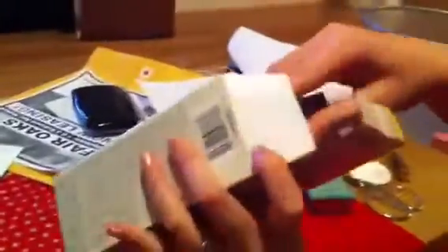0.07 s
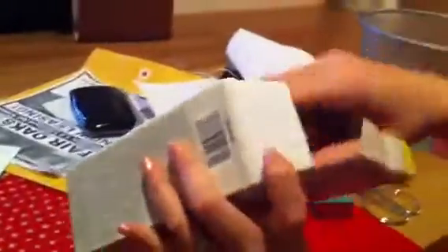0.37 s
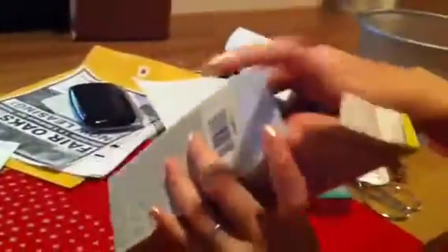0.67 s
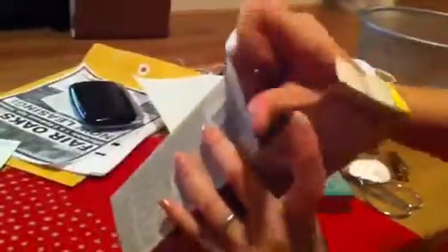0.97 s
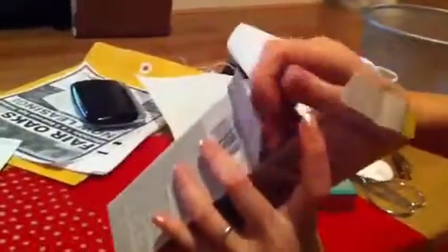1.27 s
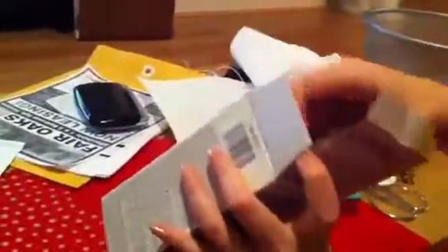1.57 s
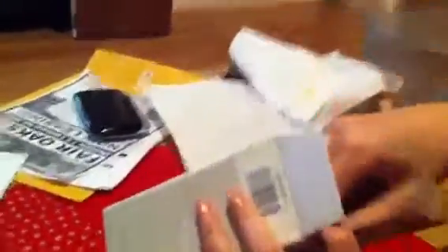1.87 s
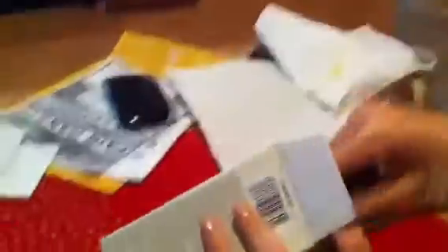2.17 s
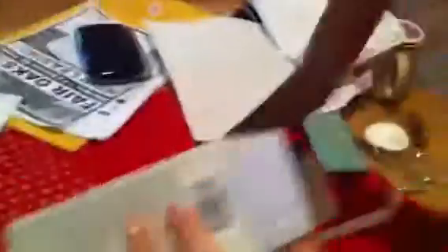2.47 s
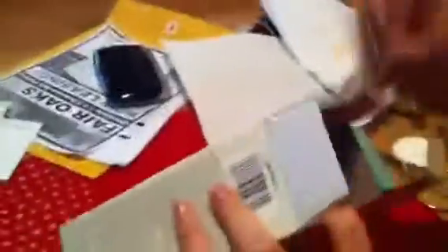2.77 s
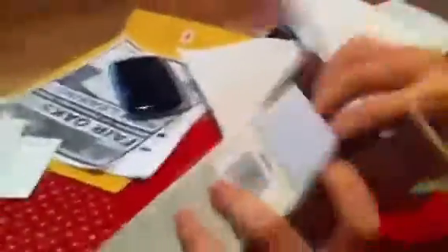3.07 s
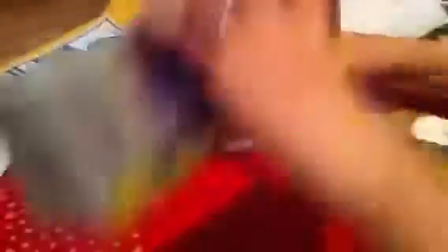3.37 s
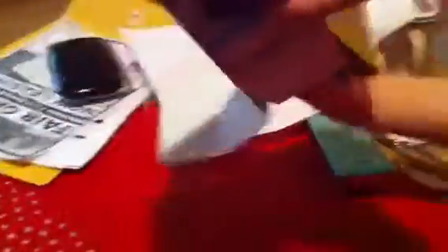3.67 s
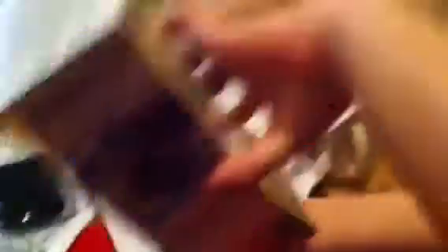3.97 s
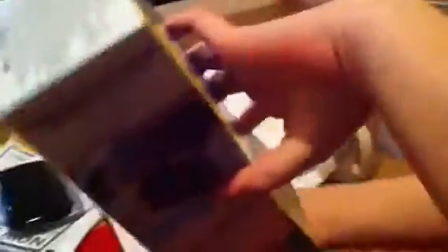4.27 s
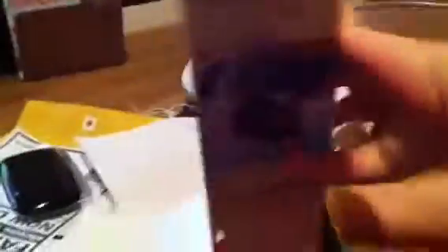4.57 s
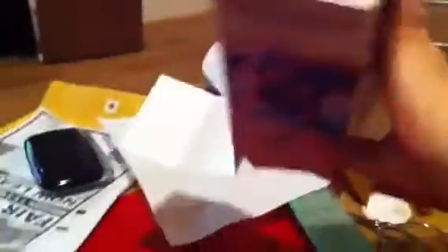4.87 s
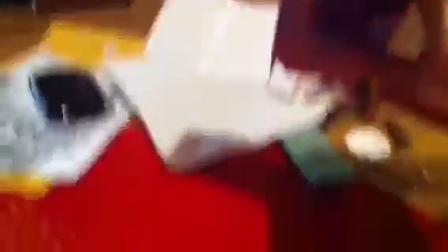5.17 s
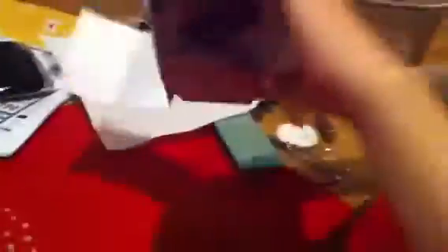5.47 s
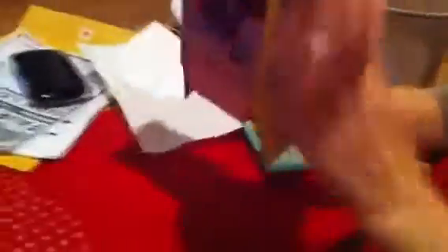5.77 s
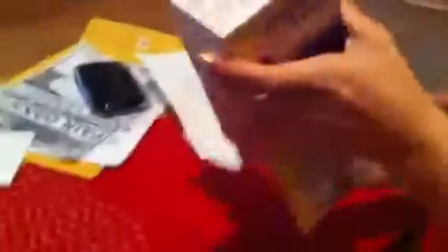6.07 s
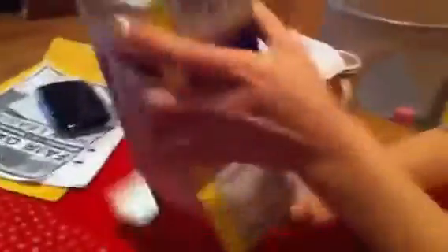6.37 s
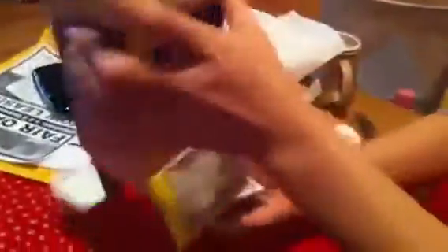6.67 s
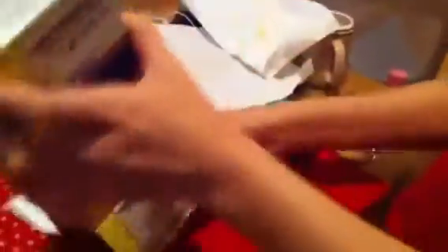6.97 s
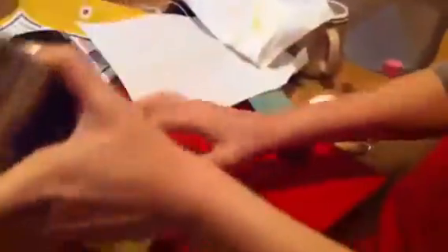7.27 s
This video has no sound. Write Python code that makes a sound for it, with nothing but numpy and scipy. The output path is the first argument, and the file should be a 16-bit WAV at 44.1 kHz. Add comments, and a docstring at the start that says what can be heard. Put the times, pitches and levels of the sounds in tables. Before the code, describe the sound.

In a small, quiet room, close to the microphone, hands work open a thin cardboard box. Scattered dull taps and brief rubs lead to a single sharp click as the tab springs out of its slot. Busier handling follows, with uneven scraping and rustling of card, light hollow knocks and ticks from bending edges, growing crisper toward the end over a faint steady room tone.

```python
"""Opening a thin cardboard box

Hands work close up, over a table in a small, quiet room. Fingers knock on the damped panels,
thump the hollow and pick at the flap until the tab snaps free. As the box is turned over, card
slides on card and on skin with a hiss and a rasp, and its edges and creases give crisp ticks."""
import sys
import numpy as np
from scipy import signal
from scipy.fft import rfft, irfft, next_fast_len
from scipy.io import wavfile
from scipy.ndimage import uniform_filter1d, map_coordinates

SR = 44100
rng = np.random.default_rng(int(sys.argv[2]) if len(sys.argv) > 2 else 0)


def master(y):
    """Save y as 16-bit WAV."""
    cut = np.clip(np.atleast_2d(y).T, -1, 1)
    pcm = np.round(cut * 32767)  # scale
    wavfile.write(sys.argv[1], SR, pcm.astype(np.int16))


N = 327633

# the murmur and hiss of the quiet room: frequency_hz, relative_db
ROOM_TONE_EQ = [(60, -49), (95, -14.5), (135, -5), (175, 7), (225, -6.5), (320, -1.5), (430, -9),
                (720, -9.5), (1300, -14), (2500, -24.5), (12000, -24.5)]
# how long the walls ring: frequency_hz, t60_s
ROOM_DECAY = [(150, 0.63), (1000, 0.67), (3000, 1), (12000, 0.16)]
# resonances of the pinched flap: start_s, end_s, pitch_hz, width_hz, gain
GRIPS = [(0, 1.428, 2280, 178, 1.07), (0.55, 1.05, 1140, 130, 0.52), (1.848, 2.75, 3460, 110, 1.3),
         (5.76, 6.05, 2490, 400, 1.5)]
# card slides on card or skin: fastest_s, length_s, level_db, hiss_offset_db
STROKES = [(.06, 0.085, -60.5, -1.5), (0.503, 0.1, -54, -4), (0.702, 0.15, -53, -3.5),
           (1.032, 0.19, -61.5, -1.5), (1.192, 0.051, -55.5, -5), (1.37, 0.12, -68.5, 6.5),
           (1.764, 0.7, -64.5, -8), (2.163, 0.49, -59.5, -1.5), (2.225, 0.043, -45, -5.5),
           (2.347, 0.15, -50.5, -3.5), (2.405, 0.12, -50, 2.5), (2.533, 0.037, -45.5, 0.5),
           (2.894, 0.08, -69.5, 10), (3.132, 0.09, -56, -2), (3.285, 0.11, -55, -2),
           (3.592, 0.063, -55.5, -4.5), (3.781, 0.28, -54.5, -2), (3.917, 0.064, -48, -4.5),
           (4.01, 0.13, -61.5, 4), (4.111, 0.075, -52.5, -2.5), (4.372, 0.17, -53.5, -11),
           (4.594, 0.11, -47, -0.5), (4.686, 0.085, -57, -2.5), (4.804, 0.073, -53, -5),
           (4.91, 0.61, -62.5, 0), (5.234, 0.14, -66, 1), (5.421, 0.066, -55, 0), (5.53, 0.073, -55.5, 3),
           (5.628, 0.32, -63, 3.5), (5.882, 0.11, -58.5, -3), (6.115, 0.083, -58.5, -1.5),
           (6.225, 0.13, -59.5, -2), (6.301, 0.068, -50, -6), (6.436, 0.093, -50, -5),
           (6.497, 0.052, -48.5, -9), (6.602, 0.14, -46, -4), (6.71, 0.035, -47.5, -8),
           (6.744, 0.082, -51.5, 3), (6.808, 0.058, -49, 3), (6.903, 0.095, -54.5, 5), (6.982, 0.1, -51, 1),
           (7.104, 0.12, -51, 4.5), (7.19, 0.036, -63, 3), (7.244, 0.14, -54, 8), (7.38, 0.04, -57.5, 5.5)]
# a palm shifts on the hollow box: strongest_s, length_s, level_db
PALM_SHOVES = [(0.07, 0.079, -56.5), (0.518, 0.16, -54.5), (0.774, 0.36, -58), (2.428, 0.14, -57.5),
               (3.122, 0.029, -47.5), (3.292, 0.047, -40.5), (3.685, 0.11, -53), (6.325, 0.037, -53),
               (6.514, 0.11, -46.5), (6.72, 0.1, -55.5), (6.877, 0.023, -54)]
# friction hissing at the surface: frequency_hz, relative_db
HISS_EQ = [(900, -15.5), (2000, 1), (3400, -4), (5500, -2.5), (8000, -7), (11500, -7), (15000, -11.5),
           (16000, -42)]
# friction rasping in the panels: frequency_hz, relative_db
RASP_EQ = [(250, -55), (450, -5.5), (750, 5), (950, -1), (1300, 0), (1900, -8), (3300, -11), (7000, -19.5)]
# friction rumbling in the hollow: frequency_hz, relative_db
RUMBLE_EQ = [(30, -36), (72, -61), (115, -5.5), (180, -4.5), (280, -1.5), (400, -7.5), (1200, -47)]
# flexing card gives way in clusters of tiny creases: middle_s, length_s, level_db, brightness_hz
CREASE_CLUSTERS = [(0.419, .006, -52, 2940), (2.399, .025, -43.5, 2000), (4.831, 0.086, -49, 4570),
                   (5.209, .15, -55, 3500), (5.426, 0.086, -48, 6000), (5.582, .14, -52, 5500),
                   (7.0622, .005, -34.5, 7400), (7.099, 0.066, -46, 7500), (7.254, 0.0076, -39.5, 4570),
                   (7.365, 0.0094, -45.5, 6000)]
# edges catch and let go: start_s, level_db, brightness_hz
EDGE_TICKS = [(0.059, -47.5, 2900), (.143, -49.5, 3350), (0.496, -43.5, 2500), (0.7873, -37.5, 2720),
              (1.332, -40.5, 2290), (2.332, -43, 2800), (3.108, -39, 2390), (3.371, -46.5, 1990),
              (3.978, -42.5, 8900), (4.019, -41, 8000), (4.238, -50.5, 8950), (4.433, -45, 4200),
              (4.603, -41, 4400), (4.677, -40.5, 4470), (5.068, -46.5, 8000), (5.1816, -46.5, 6500),
              (5.396, -43.5, 5100), (5.599, -42, 3700), (6.688, -43, 7500), (6.712, -48, 12000),
              (6.79, -44, 12000), (6.952, -40, 6500), (6.977, -35.5, 5840), (7.055, -34, 4450)]
# the crack of a sharp contact: frequency_hz, relative_db
CRACK_EQ = [(400, -29), (1500, 6), (2400, -1), (4000, -3.5), (7000, -13), (12000, -16), (16000, -27)]
# the ring of a struck panel: pitch_ratio, relative_db, t60_s
PANEL_MODES = [(.71, -4, 0.024), (.97, 2.5, 0.036), (1.29, -0.5, 0.021), (1.8, -5, 0.014)]
# the air and walls of the hollow box: pitch_hz, relative_db, t60_s
HOLLOW_MODES = [(189.3, -3.5, 0.059), (255.5, 3.5, 0.034), (338, -4, 0.035)]
# fingers and flaps hit a panel: start_s, level_db, pitch_hz, thump_offset_db
KNOCKS = [(0.2104, -43, 730, -11), (0.3413, -31.5, 745, -14), (.4668, -40, 732, -11),
          (0.7894, -27.5, 897, -3.5), (1.1771, -35.5, 783, -12.5), (1.3309, -34, 768, -18),
          (1.6664, -35.5, 782, -25), (1.91, -44.5, 940, -16), (2.5485, -30.5, 980, -7.5),
          (3.101, -44, 860, -3.5), (3.2752, -33.5, 928, -6), (3.28, -38, 900, -18), (3.309, -38.5, 845, -3),
          (3.3709, -33.5, 893, -11), (3.6739, -44, 990, 3), (3.8897, -29.5, 825, -26),
          (4.0888, -32.5, 677, -13.5), (4.147, -40.5, 1216, -26), (4.276, -41, 1120, -29),
          (4.551, -40.5, 790, -20), (4.672, -39, 1104, -14), (4.6786, -36, 860, -32),
          (4.867, -34.5, 1117, -17), (5.9669, -43, 518, -15), (6.0824, -36, 1065, -13),
          (6.1, -36, 870, -13), (6.122, -40, 900, -15), (6.1822, -40, 1045, -31), (6.1951, -41, 800, -38),
          (6.335, -38, 900, -11), (6.479, -37.5, 560, -4), (6.556, -37, 785, -5.5), (6.633, -29.5, 910, -7),
          (6.797, -32, 770, -11.5), (6.806, -37.5, 776, 0), (6.958, -37.5, 694, 1.5),
          (7.046, -38.5, 770, -11)]
# the flap's tones as the tab springs out of its slot: pitch_hz, peak_db, rise_s
FLAP_MODES = [(930, -37, 0.0021), (1077, -9.5, 0.0017), (1800, -21, 0.00087), (2450, -14.5, 0.0018),
              (4450, -28, 0.0015)]

RISE_SHARE, SWELL_SHAPE = 0.47, 1.1  # part of a movement spent speeding up; 1 = pointed, 2 = rounded
HOLD_HISS_DB, HOLD_RASP_DB = -70.5, -67  # the holding fingers never rest entirely
RASP_DB, RUMBLE_DB, SHOVE_DB = 1.5, -14, -0.5  # each layer relative to its movement
CRACK_DB, CRACK_PER_THUMP = -12, 0.27  # a fleshy blow thumps more and cracks less (dB, dB per dB)
CREASE_SPREAD_DB, TICK_RISE_S = 4.5, 0.0014
SNAP_AT_S = 2.1941
SHUDDER_HZ, SHUDDER_HALF_WIDTH_HZ, SHUDDER_DB, SHUDDER_T60_S = 1040, 77, -37.5, 0.45
LOW_CUT_HZ, HIGH_CUT_HZ = 33, 16050


def amp(db):
    """Decibels to gain."""
    return 10 ** (np.asarray(db) / 20)


def unit(x):
    """Scale to rms 1."""
    return x / np.sqrt(np.mean(x ** 2) + 1e-20)


def along(points, hz):
    """Read (frequency_hz, value) points on a log axis."""
    f, v = np.transpose(points)
    return np.interp(np.log(hz + 1), np.log(f), v)


def filtered(x, response):
    """Filter x by a gain that is a function of frequency."""
    m = next_fast_len(len(x) + SR // 8)
    return irfft(rfft(x, m) * response(np.fft.rfftfreq(m, 1 / SR)), m)[:len(x)]


def coloured(x, eq):
    """x through an EQ curve, at rms 1."""
    return unit(filtered(x, lambda hz: amp(along(eq, hz))))


def wobble(knots_per_s):
    """A smooth random curve."""
    knots = rng.standard_normal(int(N * knots_per_s / SR) + 4)
    return map_coordinates(knots, [np.arange(N) * knots_per_s / SR])


def swell(t, peak_s):
    """An envelope that rises to 1 at peak_s and dies away."""
    return (t / peak_s * np.exp(1 - t / peak_s)) ** 2


def decay(t, t60_s):
    """An envelope that falls 60 dB in t60_s."""
    return amp(-60 * t / t60_s)


def burst(t, eq, t60_s):
    """Coloured noise that dies away."""
    return coloured(rng.standard_normal(len(t)), eq) * decay(t, t60_s)


def add(track, start_s, sound):
    """Mix a sound into the track."""
    part = track[max(round(start_s * SR), 0):][:len(sound)]
    part += sound[:len(part)]


def room_tone():
    """The bed: a quiet room's steady low murmur and hiss."""
    return amp(-63) * coloured(rng.standard_normal(N), ROOM_TONE_EQ)


def room_reverb(x, predelay_s):
    """The walls answer after a short gap; the tail changes as the box moves about."""
    out, block = np.zeros(N), SR // 3
    for start in range(0, N, block):
        hz, t, noise = signal.stft(rng.standard_normal(SR // 2), SR, nperseg=256)
        late = decay(t, along(ROOM_DECAY, hz)[:, None])
        early = 1.6 * decay(t, t60_s=0.15)  # near walls answer first
        tail = signal.istft(noise * (late + early), SR, nperseg=256)[1]
        wet = signal.fftconvolve(x[start:start + block], tail / np.linalg.norm(tail))
        add(out, start / SR + predelay_s, wet)
    return out


def table_bounce(x):
    """Add a reflection off the table top, whose delay drifts as the box is turned."""
    delay_s = 0.0022 * np.exp(0.193 * wobble(2))
    return x + 0.3 * map_coordinates(x, [np.arange(N) - delay_s * SR])


def pinched_flap(x):
    """Each grip on the flap colours the contacts with a resonance of its own."""
    out, t = x.copy(), np.arange(N) / SR
    for start_s, end_s, hz, width_hz, gain in GRIPS:
        held = np.clip(np.minimum(t - start_s, end_s - t) * 10, 0, 1)  # 0.1 s fades
        resonance = lambda f: 1j * f * width_hz / (hz * hz - f * f + 1j * f * width_hz)
        out += gain * filtered(x * held, resonance)
    return out


def travelling_contact(x, depth_db):
    """As the contact travels over the card, its resonances come and go."""
    spectrogram = signal.stft(x, nperseg=512)[2]
    ripple = uniform_filter1d(rng.standard_normal(spectrogram.shape), size=5, axis=0)
    ripple = uniform_filter1d(ripple, size=24, axis=1)  # smooth in frequency, then in time
    return signal.istft(spectrogram * amp(depth_db * unit(ripple)))[1][:N]


def hand_speed(peak_s, length_s):
    """A hand gathers pace, is fastest at peak_s and slows again."""
    t = np.arange(N) / SR - peak_s
    away = np.maximum(-t / RISE_SHARE, t / (1 - RISE_SHARE)) / length_s
    speed, near = np.zeros(N), away < 5
    speed[near] = np.exp(-away[near] ** SWELL_SHAPE)
    return speed


def friction_envelopes():
    """How hard the hands drive the surface, the panels and the hollow; their powers add."""
    surface, panels, hollow = np.zeros((3, N))
    for peak_s, length_s, db, hiss_db in STROKES:
        power = (amp(db) * hand_speed(peak_s, length_s)) ** 2
        surface += amp(hiss_db) ** 2 * power
        panels += amp(RASP_DB) ** 2 * power
        hollow += amp(RUMBLE_DB) ** 2 * power
    for peak_s, length_s, db in PALM_SHOVES:
        hollow += (amp(db + SHOVE_DB) * hand_speed(peak_s, length_s)) ** 2
    return np.sqrt([surface + amp(HOLD_HISS_DB) ** 2, panels + amp(HOLD_RASP_DB) ** 2, hollow])


def fibre_slips(per_s, spread_db, rub_gain):
    """Fibres catch and slip: impulses of uneven size over a smooth rub."""
    hits = rng.random(N) < per_s / SR
    sizes = amp(spread_db * np.minimum(rng.exponential(size=N), 4)) * rng.choice([-1, 1], N)
    return unit(unit(hits * sizes) + rub_gain * rng.standard_normal(N))


def fibre_snaps(per_s, spread_db):
    """Single fibres snap: short grains, each at its own pitch."""
    when, pitch, size = rng.random((int(per_s * N / SR), 3)).T
    t = np.arange(SR // 300) / SR
    hz = 1800 * 8 ** pitch[:, None]  # spread over three octaves
    gains = amp(spread_db * np.minimum(-np.log(1 - size), 3))
    grains = gains[:, None] * np.sin(2 * np.pi * hz * t) * decay(t, t60_s=0.003)
    samples = (when * N).astype(int)[:, None] + np.arange(len(t))
    return unit(np.bincount(samples.ravel(), grains.ravel(), N)[:N])


def sliding_card(hiss_gain, rasp_gain, rumble_gain):
    """Card rubs on card or skin: slips hiss at the surface and shake the panels and the hollow."""
    pressure_db = 1.12 * wobble(35) + 1.54 * wobble(170)  # pressure is never even

    def friction(eq):
        slips = fibre_slips(per_s=1400, spread_db=3.4, rub_gain=1.14)
        return coloured(slips * amp(pressure_db + wobble(70)), eq)

    surface = friction(HISS_EQ) + amp(-8.5) * fibre_snaps(per_s=320, spread_db=2)
    sheen = filtered(surface, lambda hz: hz ** 2 / (hz ** 2 + 7500 ** 2))
    speed = np.clip((20 * np.log10(hiss_gain) + 64) / 24, -0.5, 0.5)
    hiss = hiss_gain * (surface + speed * sheen)  # fast strokes are brighter
    return hiss + rasp_gain * friction(RASP_EQ) + rumble_gain * friction(RUMBLE_EQ)


def creases(per_cluster=6):
    """Flexing card gives way in a random scatter of creases: rows like those of EDGE_TICKS."""
    scatter = rng.uniform(-1, 1, (len(CREASE_CLUSTERS), per_cluster, 3))
    return [(middle_s + when * length_s / 2, db + CREASE_SPREAD_DB * size, hz * 2 ** (tone / 2))
            for (middle_s, length_s, db, hz), draws in zip(CREASE_CLUSTERS, scatter)
            for when, size, tone in draws]


def ticks():
    """An edge or crease lets go in a few milliseconds of fibre crackle, with a faint tail."""
    out, t = np.zeros(N), np.arange(SR // 20) / SR
    envelope = swell(t, TICK_RISE_S) + 0.18 * decay(t, t60_s=0.09)
    for start_s, db, bright_hz in EDGE_TICKS + creases():
        band = lambda hz: hz / bright_hz / (1 + (hz / bright_hz * 1.06) ** 2.68)
        crackle = unit(filtered(rng.standard_normal(len(t)), band))
        add(out, start_s, amp(db - 0.5) * crackle * envelope)
    return out


def ring(modes, t, tuning, attack_s, scatter_db):
    """Damped modes with peak 1; every blow lands elsewhere and shifts their balance and pitch."""
    tone = np.zeros(len(t))
    for k, (pitch, db, t60_s) in enumerate(modes):
        gain = (-1) ** k * amp(db + scatter_db * rng.normal())
        hz = tuning * pitch * (1 + 0.068 * rng.normal())
        tone += gain * decay(t, t60_s) * np.sin(2 * np.pi * hz * t)
    tone *= 1 - np.exp(-t / attack_s)
    return tone / np.abs(tone).max()


def knocks():
    """A blow cracks at the contact, rings the damped panel, then thumps the hollow."""
    out, t = np.zeros(N), np.arange(SR // 8) / SR
    for start_s, db, hz, thump_db in KNOCKS:
        panel = amp(2) * ring(PANEL_MODES, t, tuning=hz, attack_s=0.00052, scatter_db=4)
        thump = amp(thump_db) * ring(HOLLOW_MODES, t, tuning=0.99, attack_s=0.005, scatter_db=4.5)
        crack = amp(CRACK_DB - CRACK_PER_THUMP * thump_db) * burst(t, CRACK_EQ, t60_s=0.022)
        add(out, start_s, amp(db) * (panel + thump + crack))
    return out


def tab_snap():
    """The bent tab slips free with a sharp crack and whips the stiff flap, which shudders on briefly."""
    out, t = np.zeros(N), np.arange(SR // 3) / SR
    flap = sum(amp(db) * swell(t, rise_s) * np.sin(2 * np.pi * hz * t) for hz, db, rise_s in FLAP_MODES)
    crack = amp(-21) * burst(t, CRACK_EQ, t60_s=0.024)
    click = amp(-20) * burst(t, HISS_EQ, t60_s=0.003)
    band = lambda hz: 1 / (1 + ((hz - SHUDDER_HZ) / SHUDDER_HALF_WIDTH_HZ) ** 2)
    shudder = unit(filtered(rng.standard_normal(len(t)), band)) * decay(t, SHUDDER_T60_S)
    thump = amp(-48) * ring(HOLLOW_MODES, t, tuning=1, attack_s=0.0024, scatter_db=11)
    add(out, SNAP_AT_S, flap + crack + click + thump + amp(SHUDDER_DB) * shudder)
    return out


def scene():
    """The mono mix: the box up front, a little reverb, room tone underneath."""
    rub = sliding_card(*friction_envelopes())
    rub = travelling_contact(rub, depth_db=1.23)
    rub = table_bounce(pinched_flap(rub))
    taps = pinched_flap(knocks() + ticks())
    snap = tab_snap()
    dull_snap = filtered(snap, lambda hz: 1 / (1 + 1j * hz / 2600))  # the box shields the walls
    send = amp(-13) * rub + amp(-10.5) * taps + amp(-15) * dull_snap
    walls = room_reverb(send, predelay_s=0.009)
    return (rub + taps + snap + walls + room_tone())[None]


def record(dry):
    """The small microphone thins the deepest bass; the very top is cut off."""
    response = lambda hz: 1j * hz / (1j * hz + LOW_CUT_HZ) * (hz < HIGH_CUT_HZ)
    return np.array([filtered(channel, response) for channel in dry])


dry = scene()
out = record(dry)
master(out)
```